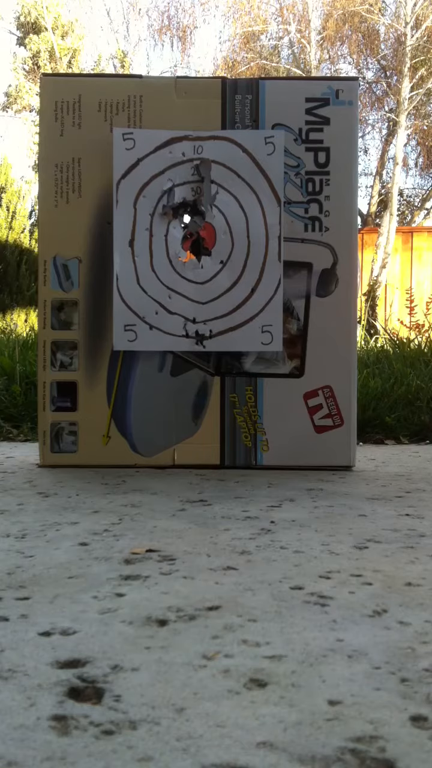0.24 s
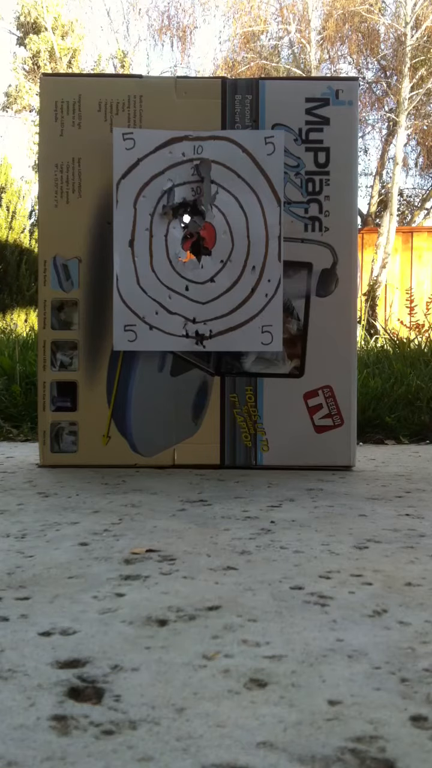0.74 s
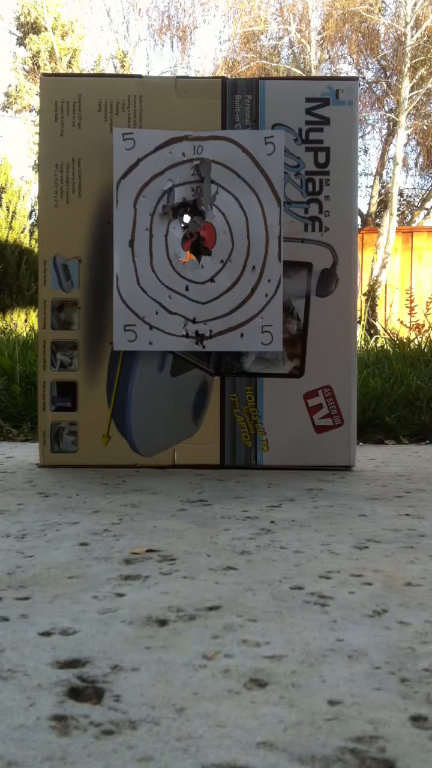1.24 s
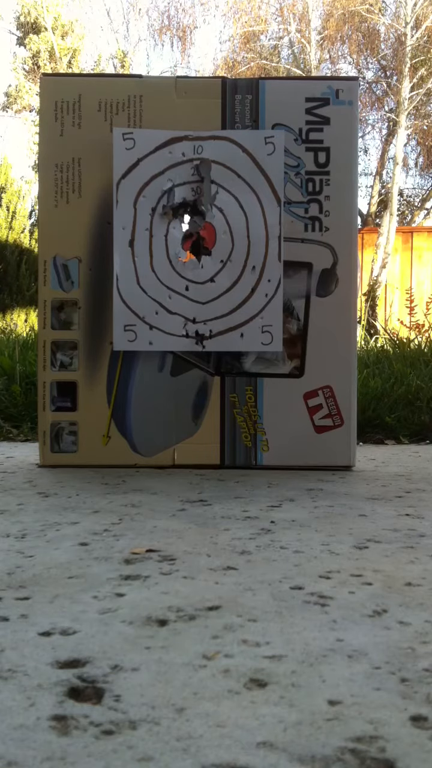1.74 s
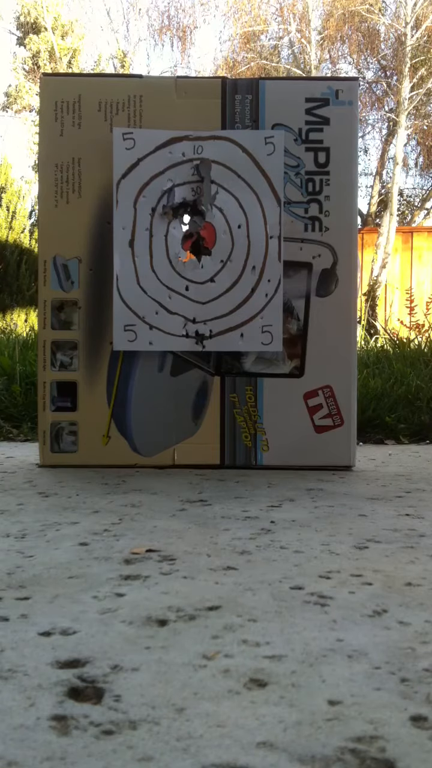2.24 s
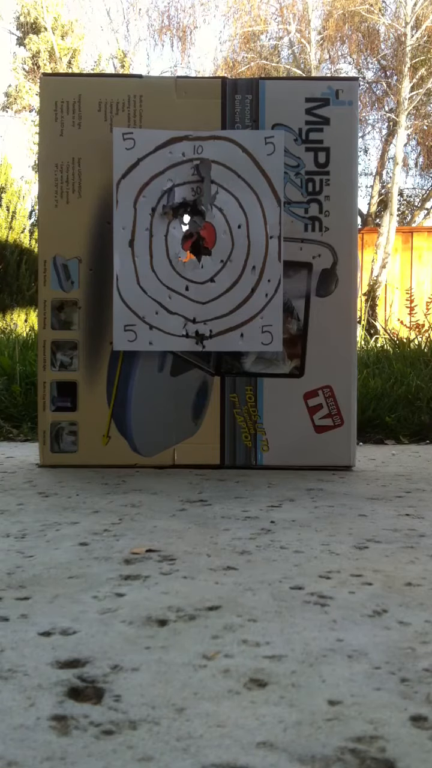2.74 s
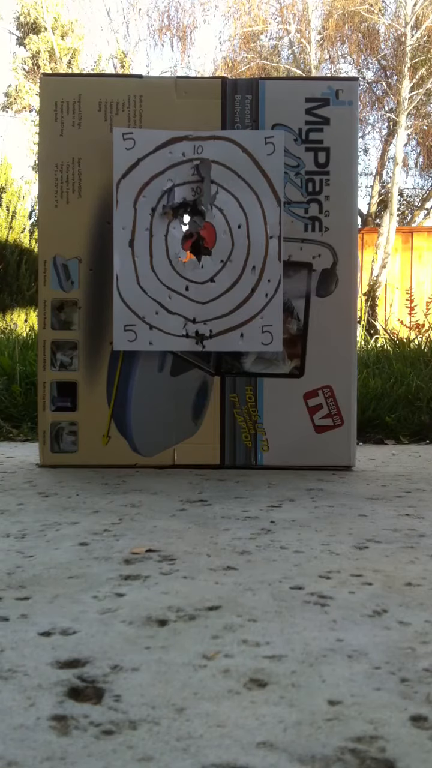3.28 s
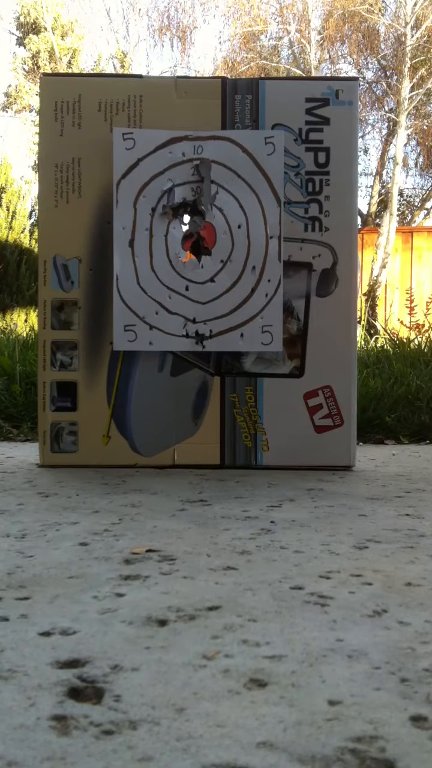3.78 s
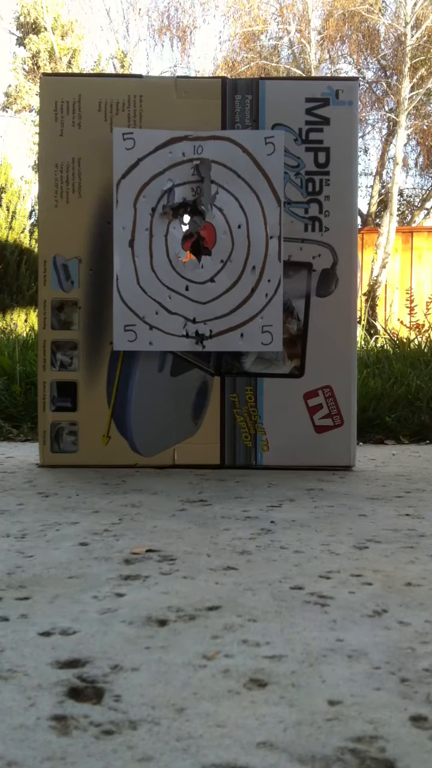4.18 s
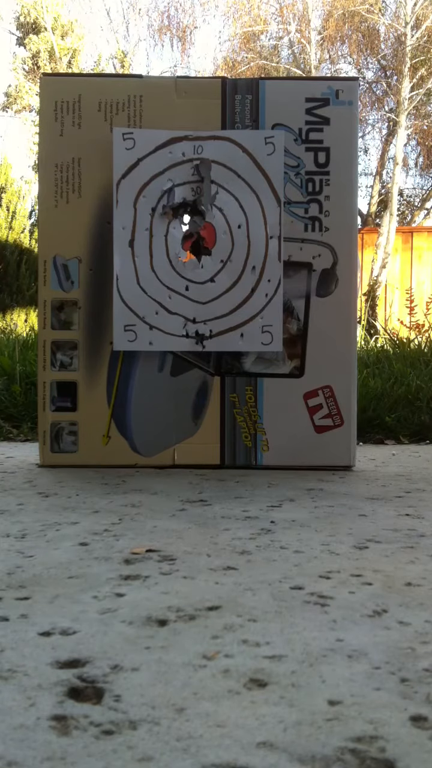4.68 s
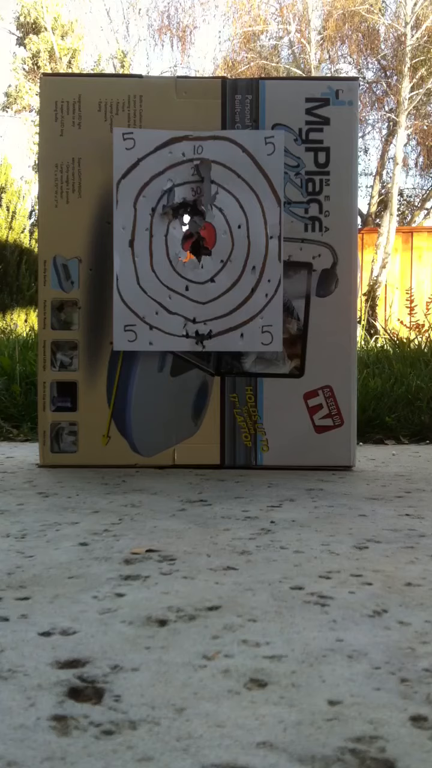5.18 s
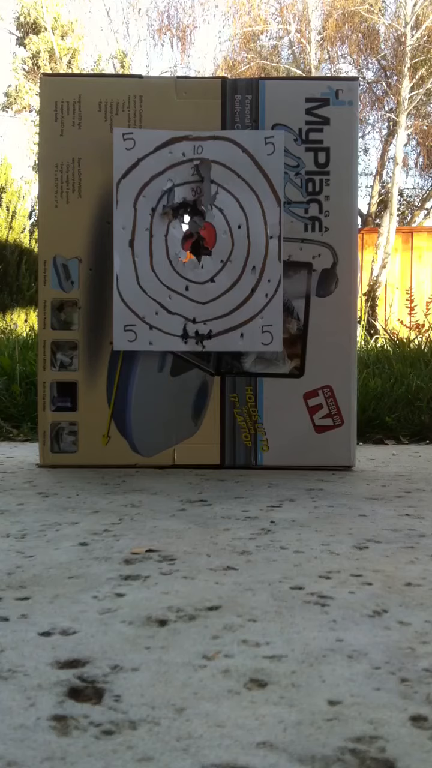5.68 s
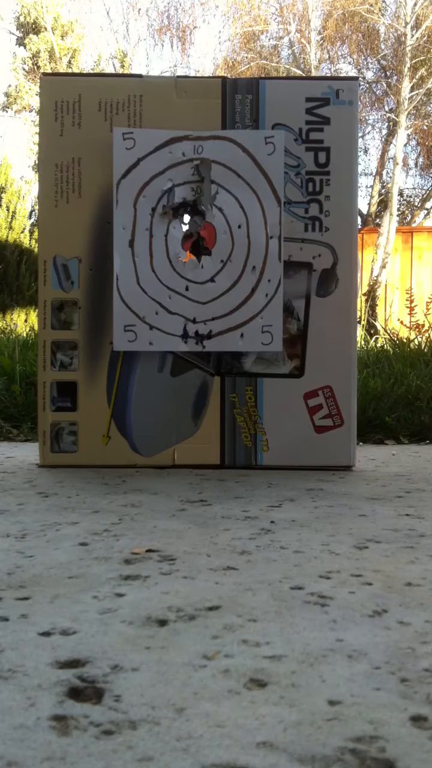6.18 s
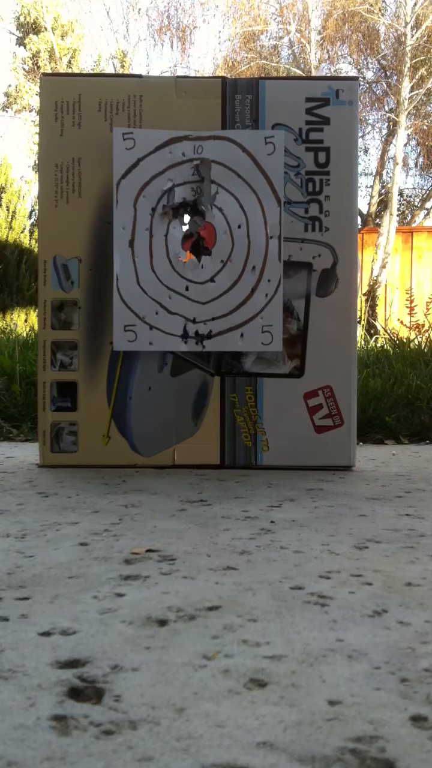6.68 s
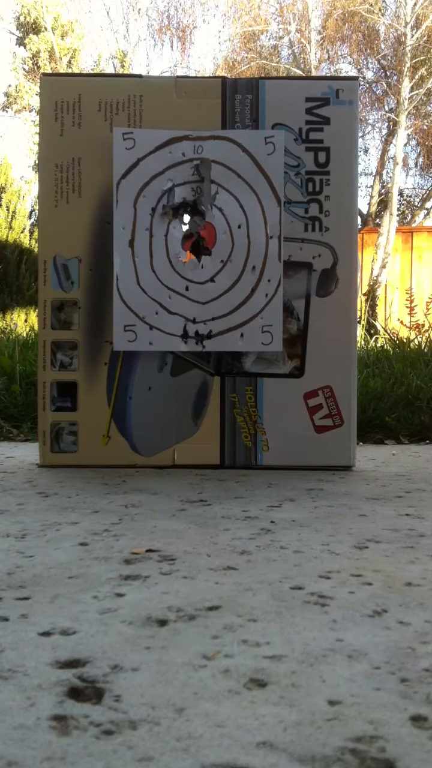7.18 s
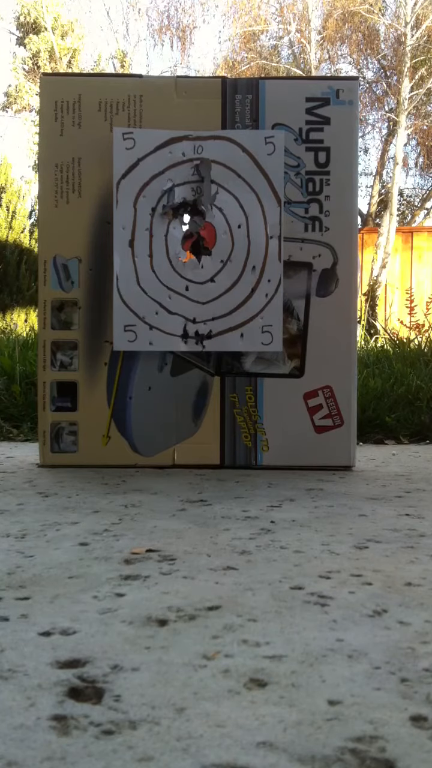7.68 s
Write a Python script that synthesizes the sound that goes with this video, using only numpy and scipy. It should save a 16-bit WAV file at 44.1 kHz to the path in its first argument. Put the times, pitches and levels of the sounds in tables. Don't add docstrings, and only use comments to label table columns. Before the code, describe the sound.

Whirring gear motor and fast snapping pops, about twelve a second, hammer a cardboard target in long and short bursts in a quiet yard.

```python
import sys
import numpy as np
from scipy import signal
from scipy.fft import rfft, irfft
from scipy.io import wavfile
from scipy.ndimage import uniform_filter1d

SR = 44100
rng = np.random.default_rng(int(sys.argv[2]) if len(sys.argv) > 2 else 0)


def elevation(decibels):
    levels = np.asarray(decibels, float)
    return 10 ** (levels / 20)


def materialize(psi):
    bounded = np.clip(np.atleast_2d(psi).T, -1, 1)
    quanta = np.round(bounded * 32767).astype(np.int16)
    wavfile.write(sys.argv[1], SR, quanta)


N = 349713


def rms_one(x):
    return x / np.sqrt(np.mean(x ** 2) + 1e-20)


def coloured(points):
    hz, db = np.transpose(points)
    grid = np.maximum(np.fft.rfftfreq(N, 1 / SR), 1)
    gain = elevation(np.interp(np.log(grid), np.log(hz), db))
    return rms_one(irfft(rfft(rng.standard_normal(N)) * gain, N))


def band(x, low_hz, high_hz):
    return signal.sosfilt(signal.butter(2, [low_hz, high_hz], "band", fs=SR, output="sos"), x)


def noise_band(low_hz, high_hz, shape=N):
    return rms_one(band(rng.standard_normal(shape), low_hz, high_hz))


def clicks(seconds, gains):
    out = np.full(N, 1e-18)
    index = np.round(np.asarray(seconds) * SR).astype(int)
    np.add.at(out, np.clip(index, 0, N - 1), gains)
    return out


def ring(x, hz, t60):
    r, w = elevation(-60 / (t60 * SR)), 2 * np.pi * hz / SR
    return signal.lfilter([0, np.sin(w)], [1, -2 * r * np.cos(w), r * r], x)


def resonate(x, hz, width_hz):
    r, w = np.exp(-np.pi * width_hz / SR), 2 * np.pi * hz / SR
    return signal.lfilter([(1 - r * r) / 2, 0, (r * r - 1) / 2], [1, -2 * r * np.cos(w), r * r], x)


def dying(x, t60):
    return signal.lfilter([1], [1, -elevation(-60 / (t60 * SR))], x)


def place(seconds, rows, lead):
    out = np.zeros(N + rows.shape[1])
    for s, row in zip(seconds, rows):
        start = round(s * SR) - lead
        out[start:start + len(row)] += row
    return out[:N]


def echo(x, delay_s, gain_db, low_hz):
    late = np.concatenate([np.zeros(round(delay_s * SR)), x])[:N]
    return x + elevation(gain_db) * band(late, low_hz, 18000)


# (pitch [Hz], level [dB per Hz])
HUM = [(20, -15.5), (75, 0), (130, 0.5), (400, -6.5), (700, -8), (1130, -12), (2230, -25.5), (15000, -29.5)]


def traffic():
    t, shot_s = np.arange(N) / SR, np.array(SHOTS)[:, 0]
    since = t - shot_s[np.maximum(np.searchsorted(shot_s, t) - 1, 0)]
    recovery_db = np.minimum(4.1 * since, 7)
    swell_db = 0.98 * noise_band(4.8, 9.3)
    return elevation(-70 + recovery_db + swell_db) * coloured(HUM)


# (pull [s], motor stalls [s], speed before the first shot [share of full])
RUNS = [
    (-.015, 2.33, 1.06),
    (2.83, 3.05, 1),
    (3.225, 3.47, .7),
    (5.068, 5.51, 1),
    (5.62, 5.875, 1),
    (5.955, 6.26, .7),
    (6.372, 8.5, 1.04),
]


def motor_speed(t):
    pull, _, share = np.transpose(RUNS)[:, np.searchsorted(np.array(RUNS)[:, 0], t) - 1]
    fired = np.array(SHOTS)[:, 0]
    first = fired[np.searchsorted(fired, pull)]
    top = uniform_filter1d(np.where(t < first, share, 1.), size=600)
    winding = uniform_filter1d(1. * (t < first), size=400)
    load = .2 * share ** 4 * winding * np.exp(-np.abs(first - t) / .012)
    run_up = 0.28 * share * np.exp(-(t - pull) / 0.034)
    return top - load - run_up, winding


# (winding up [dB], coasting out [dB])
GROWL_BY_RUN = [
    (-41, -46.5),
    (-42.5, -49.5),
    (-42.5, -53),
    (-36.5, -45.5),
    (-48.5, -44),
    (-45.5, -49.5),
    (-43.5, -43.5),
]


def effort(t):
    run = np.searchsorted(np.array(RUNS)[:, 0], t) - 1
    pull, stall, share = np.transpose(RUNS)[:, run]
    wind_db, coast_db = np.transpose(GROWL_BY_RUN)[:, run]
    fired = np.array(SHOTS)[:, 0]
    first, last = fired[np.searchsorted(fired, pull)], fired[np.searchsorted(fired, stall) - 1]
    firing_db = -44.5
    growl = np.where(t < first, wind_db, np.where(t < last, firing_db, coast_db))
    growl = uniform_filter1d(growl, size=900)
    growl = growl + 7.5 * np.exp(-np.abs(first - t) / .02)
    stall_db_per_s, coast_db_per_s = 380, 274
    growl = growl - 35 * np.exp(-(t - pull) / 0.0062) - stall_db_per_s * np.maximum(t - stall, 0)
    slowness = uniform_filter1d(np.maximum(1 - share, 0) * (t < first), size=600)
    whine = firing_db - 24.5 * slowness - 35 * np.exp(-(t - pull) / 0.027)
    whine = whine - coast_db_per_s * np.maximum(t - last - .055, 0) * (stall < N / SR)
    return growl, whine


# (multiple of the mesh pitch [count], level [dB])
MESH = [(1, -10), (2, -2), (3, 0), (4, -8)]
# (pitch [Hz], level [dB per Hz])
GRIND = [(300, -38.5), (1200, -11.5), (2500, 2.5), (3200, -7.5), (4000, 3.5), (6000, -11), (14000, -8.5),
         (16000, -22)]
# (time [s], peak level [dB])
KNOCKS = [
    (2.812, -62),
    (3.014, -31.5),
    (3.233, -37),
    (3.663, -59),
    (5.015, -52),
    (5.552, -39),
    (5.81, -32),
    (5.85, -24),
    (6.185, -32.5),
    (6.236, -31.5),
]
# (pitch [Hz], width [Hz], level [dB])
CASE = [(380, 80, -9), (650, 60, 0), (800, 120, -4), (950, 100, -7), (1250, 200, -16)]


def gearbox():
    t = np.arange(N) / SR
    growl_db, whine_db = effort(t)
    speed, winding = motor_speed(t)
    wander = noise_band(15, 90)
    turn = 2 * np.pi * np.cumsum(speed * (1 + 0.01 * wander)) / SR
    teeth = rng.standard_normal(N) * elevation(3 * noise_band(22, 200))
    shell = np.zeros(N)
    for hz, width, db in CASE:
        shell += elevation(db) * rms_one(resonate(resonate(teeth, hz, width), hz, 3 * width))
    shell = rms_one(shell)
    strain = .35 + .95 * winding
    judder = .6 + .55 * noise_band(15, 110)
    rotor_hz, mesh_hz = 465, 1320
    octave = np.sin(2 * rotor_hz * turn)
    rotor = strain * (.3 * np.sin(rotor_hz * turn) + .8 * octave) * judder
    rotor += 1.8 * winding * resonate(octave, 660, 90)
    rough = .45 + .75 * noise_band(10, 160, (len(MESH), N))
    mesh = sum(elevation(db) * np.sin(k * mesh_hz * turn) * rough[k - 1] for k, db in MESH)
    mesh = strain * speed ** 4 * mesh
    free = np.convolve(clicks(np.array(SHOTS)[:, 0] - .02, 1.), np.hanning(800))[:N]
    whine = (mesh + 1.3 * coloured(GRIND)) * (1 - .6 * free)
    knock_s, knock_db = np.transpose(KNOCKS)
    knocks = sum(ring(clicks(knock_s, elevation(knock_db + db - 2.5)), hz, 2.0 / width)
                 for hz, width, db in CASE)
    knocks = band(band(knocks, 350, 1200), 250, 1600)
    knocks += dying(clicks(knock_s, elevation(knock_db - 14)), .012) * coloured(MUZZLE)
    growl = (1 - .3 * winding) * shell + rotor
    return elevation(growl_db) * growl + elevation(whine_db) * whine + knocks


def loaded():
    gaps = np.array(HITS)[:, 0] - np.array(SHOTS)[:, :1]
    return np.any((gaps > 0) & (gaps < .025), axis=1)


# (pitch [Hz], level [dB per Hz])
MUZZLE = [(150, -37), (300, -12), (700, -1.5), (1500, -8), (4000, -8.5), (8000, -12), (13000, -4),
          (16000, -11.5)]
# (time [s], muzzle pop [dB], air thump [dB])
FIRST_BURST = [(0.0537, -13, -18), (0.1555, -14, -23), (0.2405, -13, -23.5), (0.3239, -15.5, -21.5),
               (0.407, -16, -22.5), (0.49, -13.5, -18.5), (0.5729, -15.5, -16.5), (0.6561, -14, -26),
               (0.7393, -16.5, -14), (0.8228, -16.5, -15.5), (0.9054, -15.5, -13), (0.9891, -15.5, -16.5),
               (1.072, -14, -19), (1.1563, -10, -29.5), (1.24, -15, -16.5), (1.3238, -12, -21),
               (1.4073, -13, -17.5), (1.4911, -14, -15.5), (1.5748, -15, -17), (1.659, -15, -16.5),
               (1.7426, -12.5, -18), (1.8262, -15.5, -27.5), (1.9106, -15.5, -13.5), (1.9948, -15, -24),
               (2.0792, -14.5, -14), (2.1633, -11.5, -17.5), (2.2492, -13, -17)]
SHORT_BURSTS = [(2.9266, -11.5, -17.5), (3.284, -11.5, -21), (3.3907, -13.5, -14), (5.16, -9.5, -18),
                (5.2532, -14.5, -20.5), (5.3413, -13, -24.5), (5.4271, -15.5, -17), (5.7274, -12.5, -17),
                (6.0198, -16, -19.5), (6.1191, -13, -20)]
LAST_BURST = [(6.4583, -10.5, -14.5), (6.5553, -13, -17), (6.6413, -12, -15.5), (6.727, -11.5, -27),
              (6.8111, -12, -24), (6.8968, -13.5, -19.5), (6.982, -12, -16), (7.0654, -10.5, -13),
              (7.151, -11.5, -18.5), (7.2357, -14, -20), (7.3224, -14, -24), (7.4072, -20, -12.5),
              (7.4916, -13, -23.5), (7.5786, -14.5, -21.5), (7.6634, -15.5, -22.5), (7.7473, -12.5, -23.5),
              (7.8331, -15.5, -14.5), (7.9179, -10, -16)]
SHOTS = FIRST_BURST + SHORT_BURSTS + LAST_BURST


def shots():
    s, hiss_db, thump_db = np.transpose(SHOTS)
    ring_db = hiss_db + 1.5 - 0.1 * (thump_db + 20.5) - 4 * ~loaded()
    lead = 300
    ms = (np.arange(1200) - lead) * 1000 / SR
    full = loaded()[:, None]
    peak = elevation(np.minimum(12 * ms, -np.where(full, 12, 6) * ms))
    build = elevation(-12.5 + np.minimum(2.8 * ms, -np.where(full, 3.6, 2.2) * ms))
    wobble = noise_band(1700, 2890, (len(s), len(ms)))
    chance = rng.standard_normal((len(s), 2))
    barrel_hz = 2350 * (1 + .012 * chance[:, :1])
    tone = np.cos(2 * np.pi * barrel_hz * ms / 1000 + .8 + .4 * chance[:, 1:])
    barrel = np.where(full, .95, .3) * peak * tone + (build + .3 * peak) * wobble
    barrel = elevation(ring_db)[:, None] * barrel
    sharp = 1.3 * elevation(np.minimum(20 * ms, -np.where(full, 20, 8) * ms))
    rush = elevation(-6 + np.minimum(6.0 * ms, -np.where(full, 3.0, 1.6) * ms))
    hiss = place(s, elevation(hiss_db - 6.5)[:, None] * (sharp + rush), lead) * coloured(MUZZLE)
    swing = ring(clicks(s + 0.000085, elevation(thump_db + 5.0)), 182, 0.016)
    suck = ring(clicks(s - .0003, elevation(thump_db + 15)), 620, 0.0013)
    spread = rng.standard_normal((len(s), len(CASE)))
    shell = np.zeros(N)
    for k, (hz, width, db) in enumerate(CASE):
        shell += ring(clicks(s, elevation(ring_db + db - 16) * spread[:, k]), hz, 1.6 / width)
    pop = place(s, barrel, lead) + hiss
    sharp_pop = pop * place(s, full * np.ones(len(ms)), lead)
    return echo(sharp_pop, 0.0066, -12, 1700) + pop - sharp_pop + swing - suck + shell


# (pitch [Hz], level [dB], 60 dB decay [s])
PANEL = [(317, -0.5, 0.013), (430, -2.5, 0.034), (520, 1, 0.034), (672, 0, .025), (840, -1, 0.018),
         (957, -5.5, 0.018), (1210, -7, 0.023), (1500, -5, .018), (2400, -9, 0.028)]
# (time [s], crack [dB], hollow boom [dB], crack colour [Hz])
PELLET_HITS = [(0.0728, -12, -36.5, 12400), (0.1739, -14, -10, 13500), (0.2584, -10.5, -10, 14000),
               (0.342, -15, -20, 15200), (0.4243, -14.5, -32, 4700), (0.508, -9, -5.5, 4670),
               (0.591, -13, -25, 5070), (0.6742, -11.5, -8, 6000), (0.7568, -10.5, -1, 10800),
               (0.8399, -9, -6, 12100), (0.9236, -10, -18.5, 6200), (1.0072, -7.5, -10, 11700),
               (1.09, -15.5, -25, 5100), (1.174, -12, -9, 4630), (1.258, -9.5, -12, 2740),
               (1.3413, -10.5, -39, 14000), (1.4252, -14, -8.5, 2700), (1.5088, -13.5, -8, 4000),
               (1.5927, -9, -7, 4800), (1.677, -10.5, -44.5, 14300), (1.7619, -42, -44, 13400),
               (1.8447, -7, -7, 4200), (1.9286, -13.5, -29, 4500), (2.0129, -14.5, -29, 2920),
               (2.0978, -12.5, -34, 4700), (2.1825, -9.5, -14, 6600), (2.2668, -12, -10.5, 5070),
               (2.9443, -10, -16, 5370), (3.3019, -12, -16, 5440), (3.4065, -15.5, -14, 3830),
              (5.179, -18, -38, 12300), (5.3582, -21.5, -43, 11500), (5.4456, -14, -10, 9500),
              (5.7457, -15, -7.5, 15100), (6.0378, -11, -12, 13900), (6.477, -13.5, -11, 11800),
              (6.573, -14, -39, 12900), (6.66, -15.5, -24, 9800), (6.7443, -12.5, -13, 13000),
              (6.8308, -14.5, -30, 12200), (6.9119, -10.5, -6.5, 10300), (7.0011, -16.5, -42, 2860),
              (7.342, -13, -34, 4160), (7.597, -14.5, -29.5, 4300), (7.851, -13.5, -43, 13700)]
HITS = PELLET_HITS


def hits():
    s, crack_db, boom_db, colour_hz = np.transpose(HITS)
    touch_s = s - .0003
    snap_db = crack_db + 2.5 - 0.7 * np.maximum(boom_db + 21, 0)
    panel_db = -15.5 + 0.25 * (crack_db + 8) - 0.05 * np.maximum(boom_db + 23.5, 0)
    crack_env = dying(clicks(touch_s, elevation(crack_db + 1)), .002)
    crack_env += dying(clicks(s, elevation(crack_db - 16)), .025)
    snap_env = dying(clicks(touch_s, elevation(snap_db - 2)), .004)
    snap_env += dying(clicks(s, elevation(snap_db - 14)), .035)
    crack = crack_env * noise_band(5000, 17000)
    snap = snap_env * noise_band(1300, 5800)
    t = np.arange(200) / SR
    ping_gain = elevation(np.maximum(crack_db, snap_db) + 1.5)[:, None]
    ping = ping_gain * np.sin(2 * np.pi * colour_hz[:, None] * t) * elevation(-60 * t / .0035)
    spread = rng.standard_normal((len(s), len(PANEL)))
    panel = np.zeros(N)
    for k, (hz, db, t60) in enumerate(PANEL):
        panel += ring(clicks(touch_s, elevation(panel_db + db - 4) * (0.32 + spread[:, k])), hz, t60)
    boom = ring(clicks(s, elevation(boom_db - 0.5)), 185, 0.0093)
    return echo(crack + snap + place(touch_s, ping, lead=0) + panel, 0.0098, -15.5, 900) + boom


# (pitch [Hz], level [dB per Hz])
SCATTER = [(88, -48), (150, -11), (475, 4), (759, -4), (1500, -3), (3500, -6.5), (12700, -8.5),
           (16000, -6.5)]


def yard():
    s, pop_db, _ = np.transpose(SHOTS)
    hit_s, crack_db = np.transpose(HITS)[:2]
    empty = ~loaded()
    follows = 0.26
    bangs = clicks(hit_s + 0.0024, elevation(-22.5 + follows * (crack_db + 12)))
    bangs += clicks(s[empty] + 0.0014, elevation(-28 + follows * (pop_db[empty] + 15.5)))
    near = dying(bangs, 0.12) - dying(bangs, 0.021)
    far = elevation(-19.5) * (dying(bangs, 0.31) - dying(bangs, 0.012))
    hills = elevation(-29.5) * (dying(bangs, 0.68) - dying(bangs, .1))
    grain = elevation(3.2 * noise_band(60, 600))
    tail = near * grain * coloured(SCATTER)
    tail += far * band(coloured(SCATTER), 250, 14000)
    return tail + hills * band(coloured(SCATTER), 400, 3700)


def scene():
    return (traffic() + gearbox() + shots() + hits() + yard())[None]


def thin_highs(x, depth_db):
    highs = signal.sosfiltfilt(signal.butter(2, 4000, "high", fs=SR, output="sos"), x)
    shot_s, hit_s = np.array(SHOTS)[:, 0], np.array(HITS)[:, 0]
    gate = np.zeros(N)
    ends_s, longest_s = .0055, .0115
    for s in shot_s:
        end = round((s - ends_s) * SR)
        length = (round(s * SR) - 711) % 1024 - round(ends_s * SR)
        gate[end - int(np.clip(length, 0, longest_s * SR)):end] = 1
    x = x - (1 - elevation(depth_db)) * uniform_filter1d(gate, size=40) * highs
    top = x - signal.sosfiltfilt(signal.cheby2(10, 20, 15950, fs=SR, output="sos"), x)
    bangs = clicks(np.concatenate([shot_s, hit_s]), 3.)
    near = np.minimum(np.convolve(bangs, np.hanning(500), "same"), 1)
    return x - (1 - near) * top


def roll_off(x):
    return signal.sosfilt(signal.butter(12, 16960, fs=SR, output="sos"), x)


def record(dry):
    x = .95 * np.tanh(dry / .95)
    x = signal.sosfilt(signal.butter(4, 112, "high", fs=SR, output="sos"), x) + elevation(-17) * x
    x = signal.sosfilt(signal.cheby2(12, 60, 17000, fs=SR, output="sos"), x)
    mix = thin_highs(x[0], depth_db=-17)[None]
    return roll_off(mix)


dry = scene()
out = record(dry)
materialize(out)
```